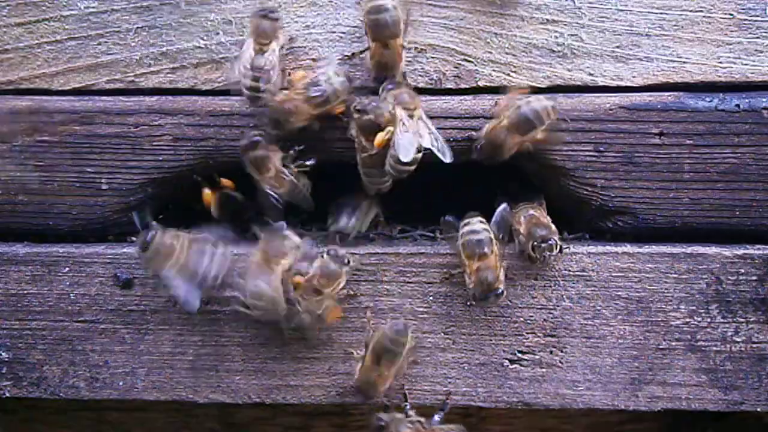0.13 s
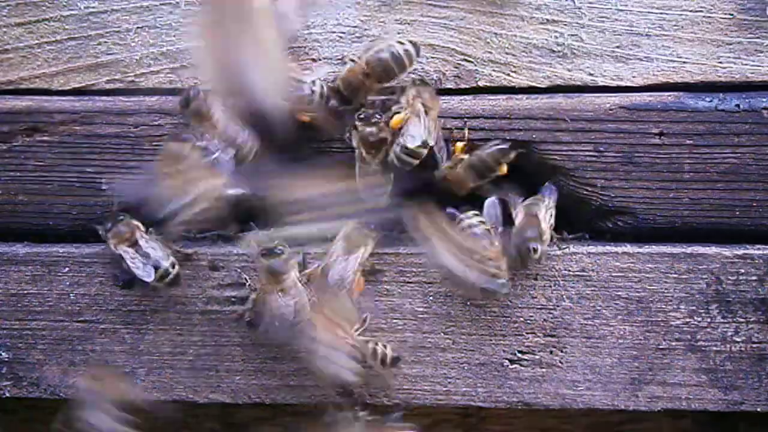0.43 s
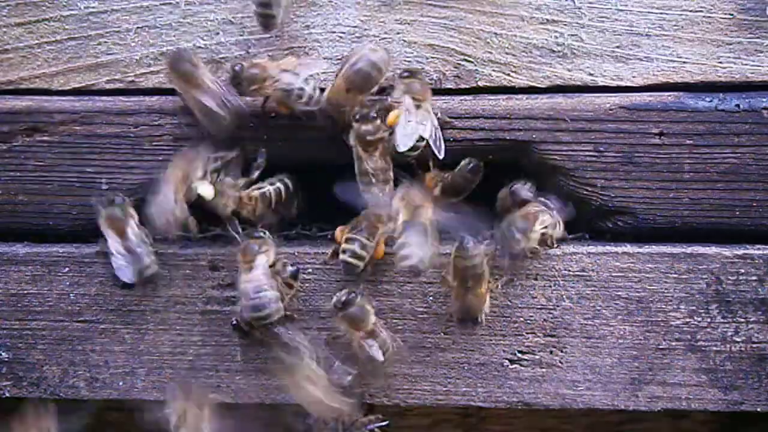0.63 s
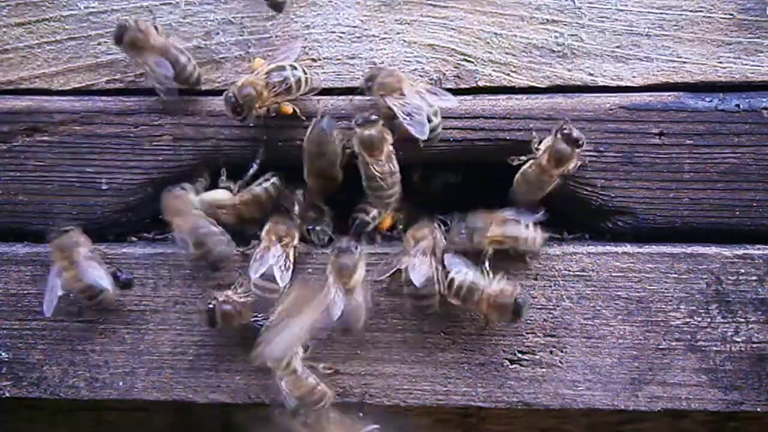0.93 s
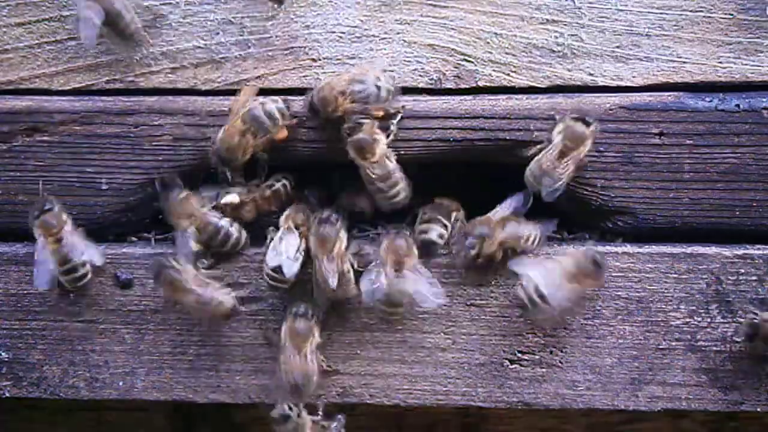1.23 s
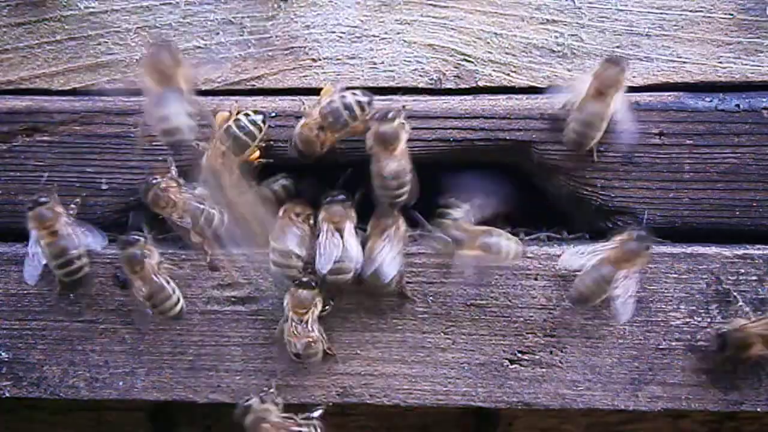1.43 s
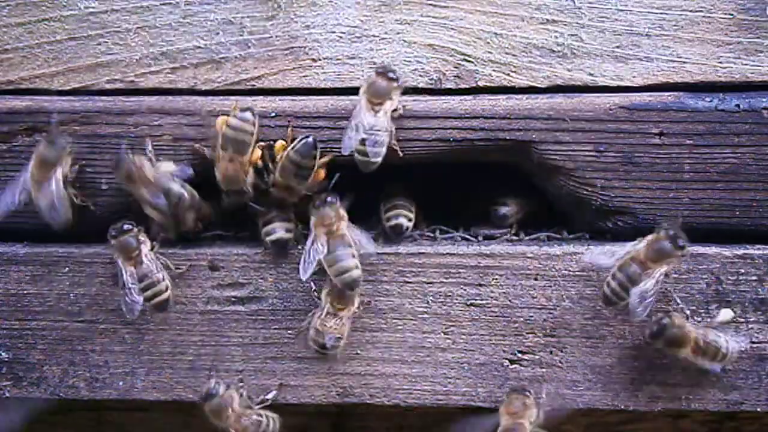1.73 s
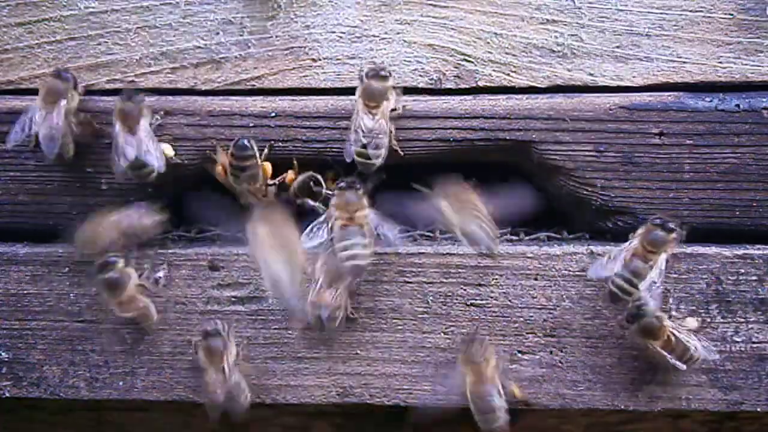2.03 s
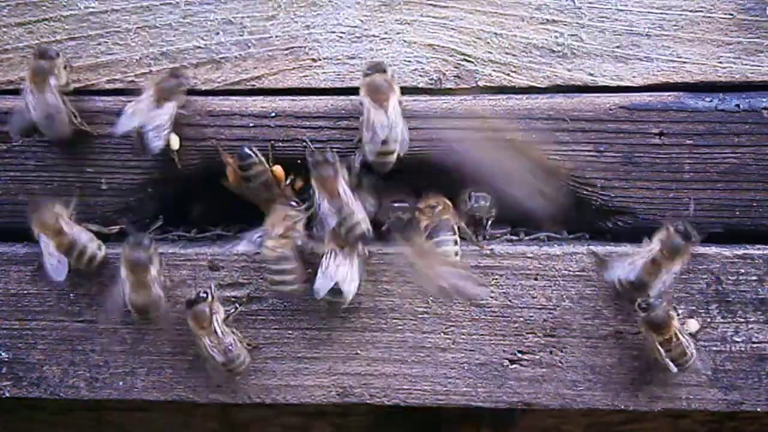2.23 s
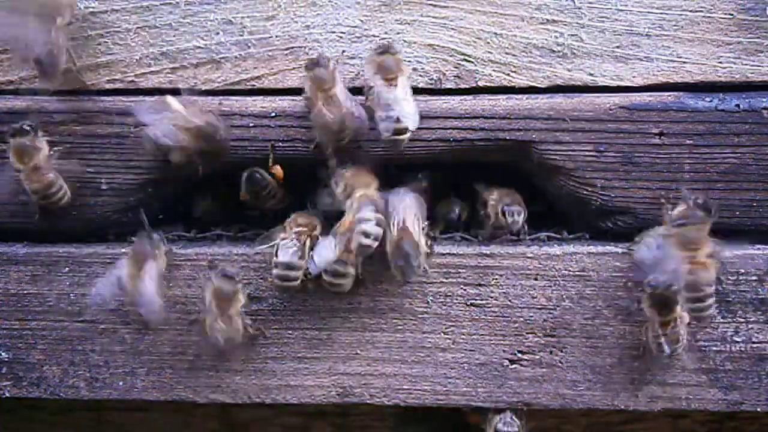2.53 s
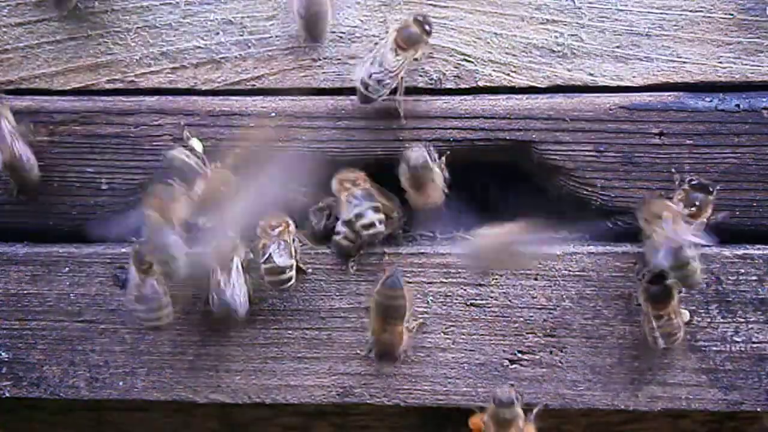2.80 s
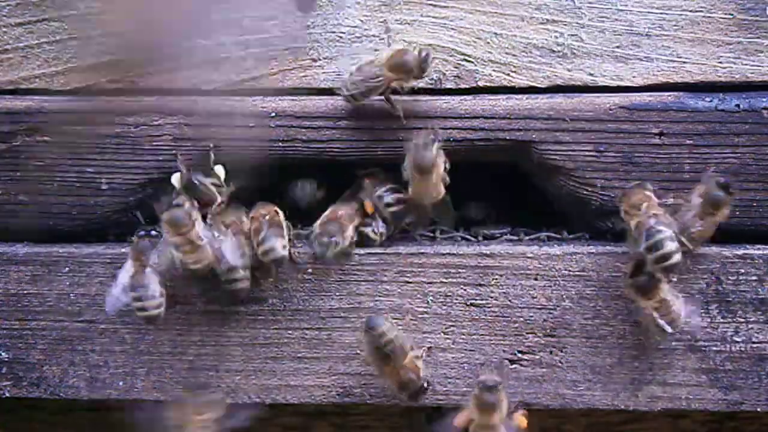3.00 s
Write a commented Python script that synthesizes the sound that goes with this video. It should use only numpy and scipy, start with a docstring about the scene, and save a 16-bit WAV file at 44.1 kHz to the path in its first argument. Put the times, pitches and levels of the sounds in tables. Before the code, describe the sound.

A dense, slightly muffled buzz of bees follows a brief burst of static. Outdoors at a wooden hive, they crowd near the microphone, some swelling past with sliding pitch, with light scraping on the wood and soft wing puffs.

```python
"""At the entrance of a wooden hive, honey bees crowd close to a microphone that misses the high treble.
Dozens of wing beats, each on its own wandering pitch, blend into a hum. Single bees swing near,
and the air from their wings puffs on the microphone. Feet and wings rustle and scrape on the boards.
The sound opens with a crack of digital static."""
import sys
import numpy as np
from scipy import signal
from scipy.fft import rfft, irfft, next_fast_len
from scipy.io import wavfile
from scipy.ndimage import map_coordinates

SR = 44100
rng = np.random.default_rng(int(sys.argv[2]) if len(sys.argv) > 2 else 0)


def persist_wave(psi):
    """Save psi, clipped to +-1, as 16-bit WAV."""
    counts = np.round(np.clip(psi, -1, 1) * 32767).astype(np.int16)
    wavfile.write(sys.argv[1], SR, np.atleast_2d(counts).T)


N = 139356

SWARM_HZ, WANDER = 239.8, .035  # typical wing beats per second, and their slow drift (.035 is 3.5%)
STATIC_FROM_S, STATIC_TO_S = .0725, .1225


def undb(db):
    """Turn decibels (dB) into a number to multiply a sound by."""
    return 10 ** (np.asarray(db) / 20)


def unit(x):
    """Scale a sound so that its average level (rms) is 1."""
    return x / np.sqrt(np.mean(x ** 2))


def gain_at(hz, points):
    """Look up how strong a frequency is on a curve of (Hz, dB) points."""
    point_hz, db = np.array(points).T
    return undb(np.interp(np.log(np.maximum(hz, 1)), np.log(point_hz), db))


def colour(x, points):
    """Shape a sound's bass and treble with a curve of (Hz, dB) points."""
    size = next_fast_len(N + N // 10)
    gains = gain_at(np.fft.rfftfreq(size, 1 / SR), points)
    return irfft(rfft(x, size) * gains, size)[:N]


def walk(rate):
    """A smooth random wobble, about 1 in size, that heads for a new value rate times a second."""
    targets = rng.standard_normal(2048)
    coarse = np.arange(0, N, 32)
    curve = map_coordinates(targets, [2 + coarse / SR * rate], order=3, mode="mirror")
    return np.interp(np.arange(N), coarse, curve)


def swell(t, at, half):
    """The rise and fall in level of something that comes close and leaves."""
    return (1 + ((t - at) / half) ** 2 / 2) ** -2.


def static(t):
    """Digital static: a short burst of loud random samples that starts and stops dead."""
    # Each row: frequency in Hz, level in dB.
    static_tone = [(40, 0.5), (300, -1.5), (1300, .5), (2400, 2), (3400, 2), (3950, 1), (4250, -11),
                   (4600, -30.5), (6000, -44), (9000, -49), (16000, -42)]
    values_per_s = 8000
    values = rng.uniform(-0.87, 1, int(N * values_per_s / SR))
    steps = values[(t * values_per_s).astype(int) % len(values)]
    sounding = (t >= STATIC_FROM_S) & (t < STATIC_TO_S)
    return 0.75 * colour(steps, static_tone) * sounding


def wing_wash(t):
    """Air stirred by wings rumbles on the microphone, and puffs when a bee flies close."""
    # Each row: time of the peak in seconds, half the length in seconds, level in dB.
    puffs = [(0.452, .12, -46.5), (0.589, 0.029, -34), (0.703, 0.04, -38.5), (0.793, .01, -31),
             (0.969, 0.076, -44.5), (1.3, 0.17, -49.5), (1.579, .018, -32), (2.23, .025, -41)]
    # The deep tone of the moving air. Each row: frequency in Hz, level in dB.
    air_tone = [(20, -11), (50, 0.5), (100, -3), (170, -5.5), (300, -9.5), (700, -17.5), (2000, -59.5)]
    rumble = unit(colour(rng.standard_normal(N), air_tone))
    steady_db = -52.5
    return rumble * (undb(steady_db) + sum(undb(db) * swell(t, at, half) for at, half, db in puffs))


def rustle():
    """Feet and wing tips tap the wood: thousands of tiny ticks that blur together."""
    # The tone of the ticks. Each row: frequency in Hz, level in dB.
    wood_tone = [(100, -17.5), (350, 0.5), (700, -1), (950, -2), (1300, 0), (1800, -4), (2400, -3),
                 (3100, -1.5), (3700, 0), (4400, -8)]
    ticks_per_s, spread_db = 5000, 3.5
    ticks = (rng.random(N) < ticks_per_s / SR) * rng.choice([-1, 1], N)
    strengths = undb(spread_db * rng.standard_normal(N))
    return unit(colour(ticks * strengths, wood_tone))


def scrapes(t):
    """Beating wings brush the boards, making a bright rasp on each stroke."""
    # Each row: time of the peak in seconds, half the length in seconds, level in dB.
    brushes = [(.53, 0.0097, -33.5), (0.566, 0.0017, -28), (1.02, 0.1, -42.5), (1.525, .015, -38),
               (1.631, 0.024, -36), (1.9198, .002, -27), (2.941, .003, -35), (3.065, .04, -39.5)]
    # Each row: frequency in Hz, level in dB.
    rasp_tone = [(300, -36.5), (1500, -7.5), (2500, -2.5), (3600, 3.5), (4400, -6.5), (6000, -50.5)]
    beat_hz = SWARM_HZ * (1 + WANDER * walk(12))
    phase = np.cumsum(beat_hz) / SR % 1  # runs from 0 to 1 during each stroke
    rasp = unit(colour(rng.standard_normal(N) * np.exp(-phase / .8), rasp_tone))
    return rasp * sum(undb(db) * swell(t, at, half) for at, half, db in brushes)


def wings(beat_hz, centre_hz, tone, first_db, uneven_db):
    """One bee buzzes by repeating its own wing stroke, beat_hz times a second."""
    size = 1024  # samples in one stroke
    harmonics = np.arange(1, 25)  # pure tones at 1, 2, 3.. times the wing beat
    random_db = uneven_db * rng.standard_normal(len(harmonics))
    phases = np.exp(2j * np.pi * rng.random(len(harmonics)))
    strengths = gain_at(harmonics * centre_hz, tone) * undb(first_db * (harmonics == 1) + random_db)
    stroke = unit(irfft(np.r_[0, strengths * phases], size))
    position = np.cumsum(beat_hz) / SR % 1 * size
    return np.interp(position, np.arange(size + 1), np.r_[stroke, stroke[0]])


def near_bees(t):
    """Single bees stand out from the hum as they swing past, sliding in pitch."""
    # Each row: time when closest in seconds, half the length in seconds, wing beat in Hz, slide in Hz
    # per second, level in dB, change to the lowest harmonic in dB (it depends on how the bee faces).
    passes = [(0.512, .08, 255.8, 90, -33, -4.5), (0.591, .05, 279, -40, -38.5, -1),
              (0.617, .09, 229.9, -31.5, -37, 2), (0.782, .07, 242.8, -61, -41, 4.5),
              (0.982, .1, 190, -89.5, -40.5, -7.5), (1.019, .08, 237.3, 40.5, -40.5, -3),
              (1.05, 0.07, 273.2, -2.5, -42, -4.5), (1.419, .07, 240, -30, -43, 3.5),
              (1.712, .038, 268.4, 20, -27, 0.5), (1.799, .013, 249, -1, -29, -2),
              (1.863, .022, 269, -40.5, -30.5, -4.5), (1.991, .05, 230.2, -100, -41.5, 2),
              (2.477, .045, 234.2, -21, -33.5, 7.5), (2.694, .06, 234.5, -110, -31.5, -3),
              (2.85, .07, 236.2, 50, -36, -4.5), (2.951, .035, 266.9, 120, -30, 1),
              (2.968, 0.044, 191, -41, -38, -1), (3.013, .04, 284.6, 0, -31, -3),
              (3.097, 0.066, 278.1, -50.5, -33.5, -9)]
    # The rounder buzz of a bee close by. Each row: frequency in Hz, level in dB.
    near_tone = [(250, -1), (520, 0.5), (690, -8), (820, -10.5), (1050, -12), (1330, -10), (1700, -15.5),
                 (2400, -21), (3600, -20), (4400, -27)]
    flutter, jitter = .00397, .003  # quick and beat-to-beat changes, as fractions of the pitch
    buzzes = 0
    for at, half, hz, slide, db, first_db in passes:
        sliding_hz = hz + slide * 2 * half * np.tanh((t - at) / (2 * half))
        beat_hz = sliding_hz * (1 + flutter * walk(30) + jitter * walk(240))
        buzz = wings(beat_hz, hz, near_tone, first_db, uneven_db=0.55)
        buzzes += buzz * undb(db) * swell(t, at, half)
    return buzzes


def swarm(count):
    """Many bees, each drifting in pitch and distance, blend into one hum."""
    # The strength of the wing beat's harmonics. Each row: frequency in Hz, level in dB.
    wing_tone = [(180, -1), (260, -1), (400, -1.5), (520, 1.5), (680, -7), (850, -8.5), (1250, -3),
                 (1700, -11), (2400, -15.5), (3600, -14), (4400, -22)]
    flutter, jitter = .007, .00413  # quick and beat-to-beat changes, as fractions of the pitch
    pitch_spread, come_and_go_db = .09, 1.5
    hum = 0
    for rank in np.linspace(-1, 1, count):  # from the lowest-pitched bee to the highest
        centre_hz = SWARM_HZ * np.exp(pitch_spread * (rank + rank ** 3))
        beat_hz = centre_hz * (1 + WANDER * walk(5) + flutter * walk(35) + jitter * walk(240))
        buzz = wings(beat_hz, centre_hz, wing_tone, first_db=0, uneven_db=2.5)
        hum += buzz * undb(come_and_go_db * walk(6.06))
    return unit(hum)


def scene():
    """Hum and rustle follow the traffic at the entrance; near bees, scrapes and puffs lie on top."""
    # How busy the entrance is. Each row: time in seconds, change of level in dB.
    activity = [(.12, -7), (.2, -4), (.3, -0.5), (.42, 1.5), (.53, 2.5), (.66, 1.5), (.85, 0.5),
                (1.05, -0.5), (1.22, -1.5), (1.42, -0.5), (1.6, 0.5), (1.85, 0), (2.15, -1), (2.5, -1),
                (2.8, -1), (3.0, 0), (3.16, 0)]
    t = np.arange(N) / SR
    busy = undb(np.interp(t, *np.array(activity).T))
    crowd = undb(-34.5) * swarm(count=28) + undb(-37) * rustle()
    return (busy * crowd + near_bees(t) + scrapes(t) + wing_wash(t))[None]


def record(dry):
    """The recorder opens with static, then lets the bees in without high treble. Loud peaks are cut flat."""
    # What the recorder lets through. Each row: frequency in Hz, change of level in dB.
    passband = [(20, 0), (3780, 0), (4050, -5.5), (4400, -18), (4570, -37), (4700, -80)]
    offset, clip_level = -.009, .72  # the offset shifts the wave slightly below zero
    t = np.arange(N) / SR
    muffled = colour((dry[0] + offset) * (t >= STATIC_TO_S), passband)
    clipped = np.clip(muffled + static(t), -clip_level, clip_level)
    top_cut = signal.ellip(8, .2, 70, 16000, fs=SR, output="sos")  # removes sound above 16000 Hz
    return signal.sosfilt(top_cut, clipped)[None]


dry = scene()
out = record(dry)
persist_wave(out)
```